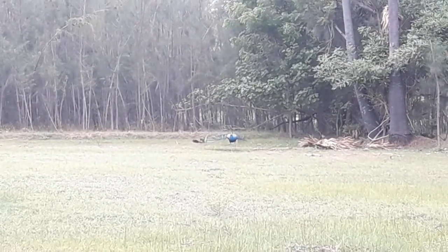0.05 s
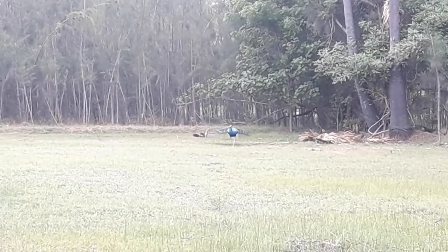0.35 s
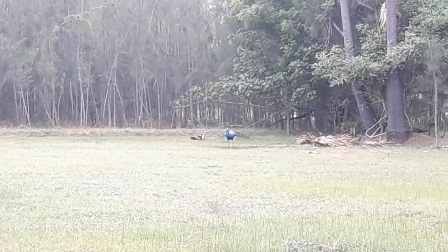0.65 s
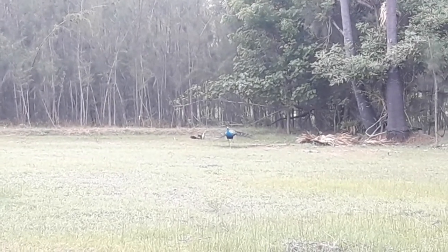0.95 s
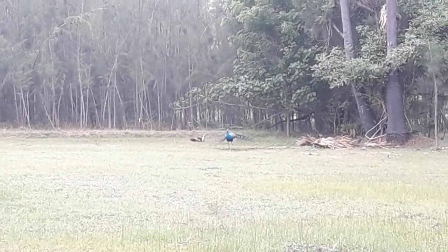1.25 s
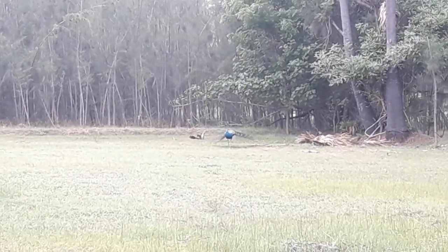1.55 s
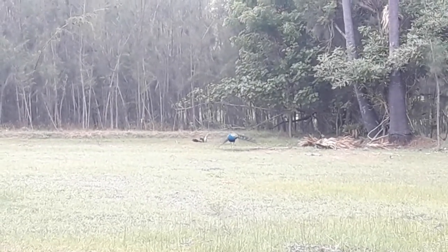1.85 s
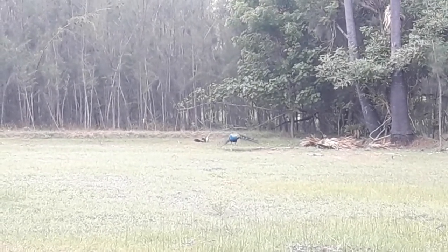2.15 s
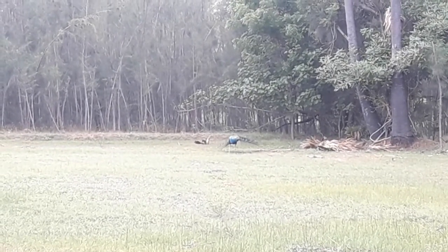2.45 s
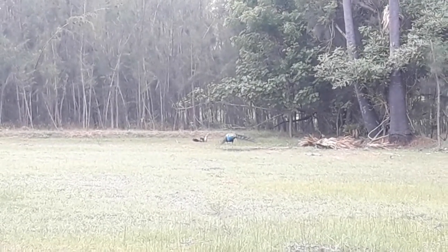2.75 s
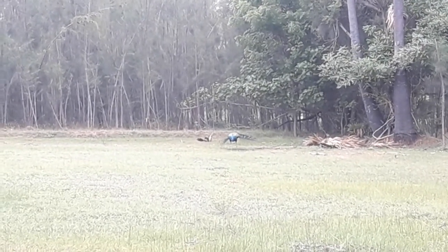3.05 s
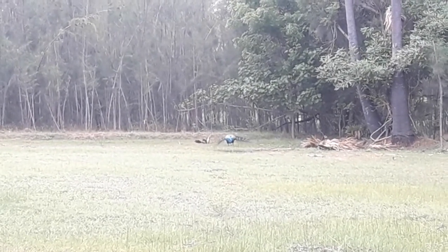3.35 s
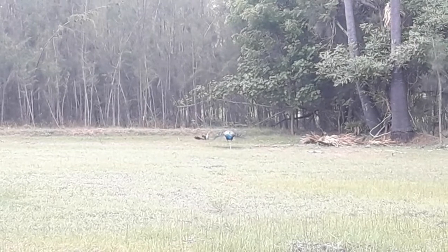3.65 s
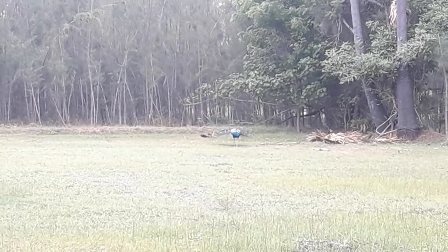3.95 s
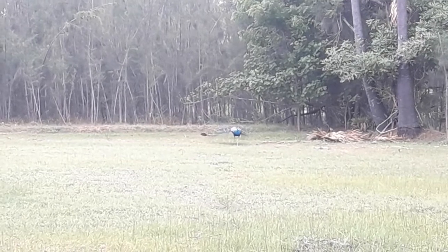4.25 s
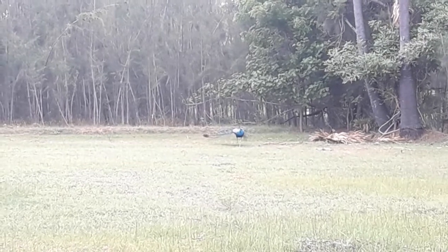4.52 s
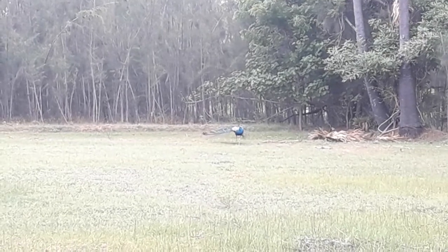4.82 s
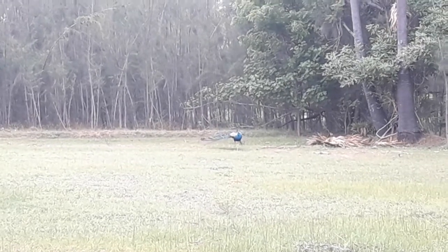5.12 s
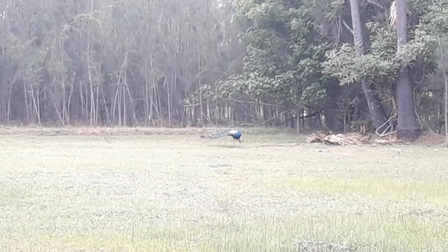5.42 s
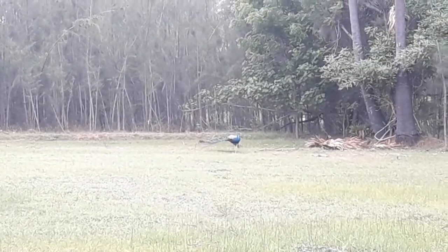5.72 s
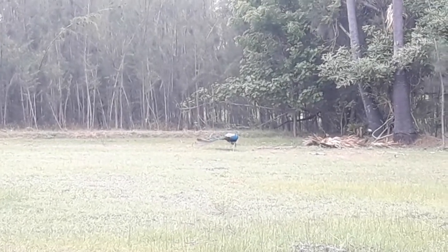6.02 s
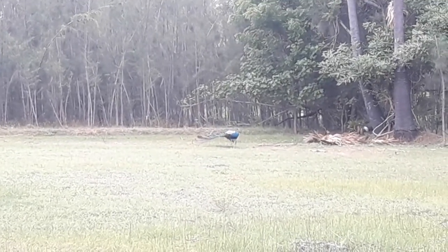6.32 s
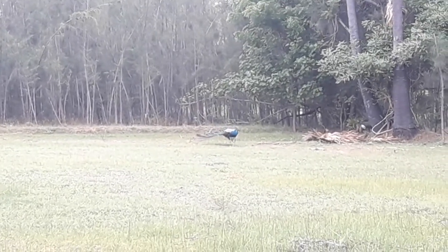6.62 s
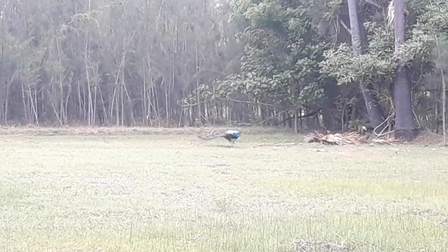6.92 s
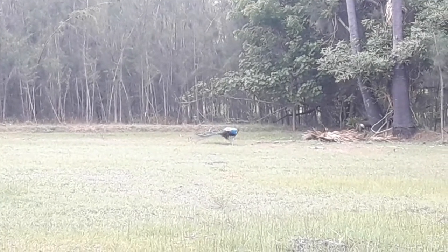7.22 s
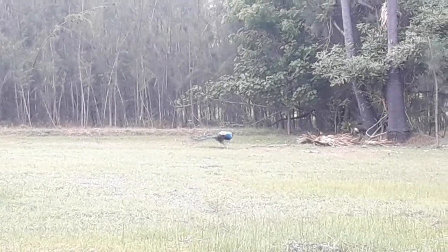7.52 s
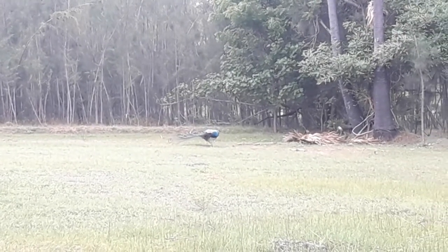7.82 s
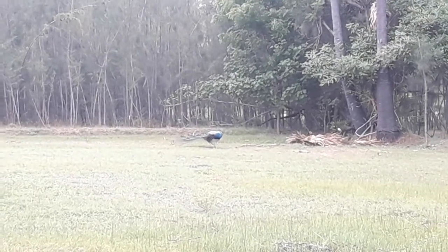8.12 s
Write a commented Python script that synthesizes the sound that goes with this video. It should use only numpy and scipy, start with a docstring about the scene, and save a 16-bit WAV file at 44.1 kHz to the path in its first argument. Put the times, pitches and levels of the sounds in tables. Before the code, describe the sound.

Soft hiss and a far low rumble fill a quiet field throughout. A bird rasps briefly at the start, and a small bird repeats a high two-note whistle in short groups until about 4 seconds. Faint calls and trills carry from deep in the wood. Handling knocks sound at the microphone near 1, 3.9 and 4.3 seconds, with thin ticks scattered around. Far fowl caw hoarsely near 3 and 5 seconds. A high twitter runs from 3.3 to 3.9 seconds, ending with sharp little snaps close by. From 4.5 to 6 seconds a louder bird gives two harsh rasps and three falling whistles. At about 6 seconds a distant gunshot thumps, echoes off the tree line and fades in a low roll. A few small snaps follow, and from 7 seconds faint chirps, trills and distant caws continue to the end.

```python
"""A quiet grass field at the edge of a wood, over soft hiss and far rumble. A loud bird rasps, a small one
repeats a whistled two-note song, and calls and trills carry from deep in the trees. Close to the microphone
come sparse knocks and ticks. Far fowl caw, a bird twitters high up, small snaps sound nearby, and the loud
bird returns with rasps and down-slurs. Near six seconds a distant gunshot thumps and rolls along the tree
line; faint chatter starts up after it."""
import sys
import numpy as np
from scipy import signal
from scipy.fft import rfft, irfft, next_fast_len
from scipy.io import wavfile

SR = 44100
rng = np.random.default_rng(int(sys.argv[2]) if len(sys.argv) > 2 else 0)


def log_audio(samples):
    """Write samples as a 16-bit WAV file to the path given in sys.argv[1]."""
    # one column per channel
    frames = np.atleast_2d(samples).T
    # limit to full scale, then quantise
    limited = np.clip(frames, -1, 1)
    pcm = np.round(limited * 32767).astype(np.int16)
    wavfile.write(sys.argv[1], SR, pcm)


N = 369116
T = np.arange(N) / SR


def from_db(db):
    return 10 ** (np.asarray(db) / 20)


def rms_one(x):
    return x / np.sqrt(np.mean(x ** 2) + 1e-20)


def add(out, s, x):
    """Mix x into out from time s on."""
    at = round(s * SR)
    x, at = x[max(-at, 0):], max(at, 0)
    out[at:at + len(x)] += x[:max(len(out) - at, 0)]


def colour(x, spectrum):
    """Filter by an (f/Hz, level/dB) outline that falls 30 dB an octave past its ends."""
    hz, db = np.transpose(spectrum)
    size = next_fast_len(len(x))
    octave, knots = np.log2(np.arange(size // 2 + 1) * SR / size + 1), np.log2(hz)
    outside = np.abs(octave - np.clip(octave, knots[0], knots[-1]))
    gain = from_db(np.interp(octave, knots, db) - 30 * outside)
    return irfft(rfft(x, size) * gain, size)[:len(x)]


def noise(spectrum):
    return rms_one(colour(rng.standard_normal(N), spectrum))


def wander(t, per_s):
    """A random wobble of spread about 1."""
    knots = rng.standard_normal(N // 20)
    return np.interp(t * per_s, np.arange(len(knots)), knots)


def band(x, low_hz, high_hz):
    sos = signal.butter(2, [low_hz, min(high_hz, .45 * SR)], "band", fs=SR, output="sos")
    return signal.sosfilt(sos, x + 1e-18)


def resonate(x, hz, width_hz):
    r = np.exp(-np.pi * width_hz / SR)
    feedback = [1, -2 * r * np.cos(2 * np.pi * hz / SR), r * r]
    return signal.lfilter(np.array([1, 0, -1]) * (1 - r * r) / 2, feedback, x + 1e-18)


def trees(x, near_db, far_db, near_t60=0.13, far_t60=0.86):
    """Echoes only: quick scatter from nearby branches and a long, duller tail from the wood."""
    t = T[:SR]
    near, far = rng.standard_normal((2, SR)) * (1 - np.exp(-t / 0.003))
    near = rms_one(near * from_db(-60 * t / near_t60))
    far = rms_one(far * from_db(-60 * t / far_t60))
    far = signal.sosfilt(signal.butter(1, 6000, fs=SR, output="sos"), far)
    echoes = (from_db(near_db) * near + from_db(far_db) * far) / np.sqrt(SR)
    return signal.fftconvolve(x, echoes)[:N]


# the open field's far rumble, its hiss, and the hiss that differs left to right: f/Hz, relative level/dB
FAR_RUMBLE = [(25, -55), (40, -16), (60, -14), (75, -4), (90, 3), (120, -4.5), (160, -0.5), (200, -9),
              (250, -14), (400, -31)]
FIELD_HISS = [(250, -2), (400, 1.5), (700, -1.5), (1200, -5.5), (2500, -8.5), (4000, -12), (5600, -13),
              (6800, -22.5), (8000, -27), (9500, -24), (11500, -19), (16000, -17.5)]
SIDE_HISS = [(53, -38), (90, -12), (124, -11), (161, -13), (222, -0.5), (667, 1), (743, 1), (3290, -7),
             (5510, -19.5), (14200, -7), (15500, -9)]

def field_air():
    """Low rumble from far off, and soft hiss all round the microphone."""
    rumble = from_db(-58 + 0.39 * wander(T, 1.7)) * noise(FAR_RUMBLE)
    hiss = from_db(-65) * noise(FIELD_HISS)
    side = from_db(-77) * noise(SIDE_HISS)
    return rumble + hiss + np.array([side, -side])


# the loud bird's rasps: start t/s, end t/s, level/dB, tilt/(dB per octave)
RASP_CALLS = [(-.12, 0.057, -50, 7.5), (4.554, 4.759, -50, 6), (5.485, 5.675, -50.5, 6)]
# its throat: f/Hz, relative level/dB
THROAT = [(590, -58), (1000, -48), (1140, -7), (1260, -11.5), (1360, -10), (1570, -6.5), (2070, -7.5),
          (3120, -3.5), (3890, -2.5), (5600, -17.5), (6180, -17.5), (8240, -44), (12100, -40), (14000, -47)]

def rasps(pulse_hz=215, jitter=0.19, depth=0.19, attack_s=0.037, release_s=0.017):
    """A harsh churr among the trees: noise chopped by the unevenly flapping syrinx, shaped by the throat."""
    out = np.zeros(N)
    for start, end, db, tilt in RASP_CALLS:
        t = T[:int((end - start) * SR)]
        phase = 2 * np.pi * np.cumsum(pulse_hz * (1 + jitter * wander(t, 312))) / SR
        chopped = rng.standard_normal(len(t)) * (1 + depth * np.cos(phase))
        throat = [(hz, level + tilt * np.log2(hz)) for hz, level in THROAT]
        swell = np.minimum(t / attack_s, 1) * np.minimum((t[-1] - t) / release_s, 1)
        add(out, start, from_db(db) * swell * rms_one(colour(chopped, throat)))
    return out + trees(out, near_db=-3, far_db=-2)


# outline of each whistled syllable: share of its length, pitch ratio, relative level/dB
SYLLABLES = { "tsit": [(0, .87, -15), (.2, 1, -9.5), (.45, .8, -3.5), (.62, .64, -5), (1, 0.353, -12.5)],
             "tew": [(0, .86, -17), (.18, .98, -6.5), (.38, 1.005, -1), (.8, .94, -5), (1, .89, -15)],
             "twit": [(0, 1.02, -9), (.26, .955, -2), (.38, .97, -18), (.58, 1.03, -15), (.67, 1.025, -1.5),
             (.87, .975, -3.5), (1, .88, -9)], "slur": [(0, .99, -6.5), (.26, 0.98, -6), (.41, .875, -1.5),
             (.56, .78, -4), (.76, .705, -5.5), (1, .645, -5.5)], "rise": [(0, .87, -1.5), (.6, 1, -1),
             (1, 1.1, -6)], "fall": [(0, 1.05, 3.5), (.3, 1.01, 2.5), (1, .93, -2)], "glide": [(0, 1, 0),
             (.5, .89, -5), (1, .79, 1.5)], "buzz": [(0, 1, -10), (.3, 1, 0), (.7, .985, 0), (1, .98, -10)],
             "hoot": [(0, 1.01, -10), (.1, 1.02, 1), (.8, .93, -4), (1, .9, -10)],
             "peep": [(0, 0.97, -13.5), (.4, 0.97, -1.5), (1, 0.99, -0.5)], }
# unsteadiness of each syllable: share of its pitch
PITCH_WAVER = {"tsit": .06, "tew": .003, "twit": .01, "slur": .015, "rise": .03, "fall": .018, "glide":
               .015, "buzz": .055, "hoot": .07, "peep": .018}

def whistles(notes, flutter_db, overtone_db, hoarse_db):
    """Each syllable is a gliding, unsteady near-sine; a rough edge smears its overtones."""
    out = np.zeros(N)
    for s, shape, length, hz, db in notes:
        t = T[:int(length * SR)]
        share, ratio, swell = np.transpose(SYLLABLES[shape])
        pitch = hz * np.interp(t / length, share, ratio) * (1 + PITCH_WAVER[shape] * wander(t, 608))
        phase = 2 * np.pi * np.cumsum(pitch) / SR
        level = from_db(db + np.interp(t / length, share, swell) + flutter_db * wander(t, 251))
        smear = wander(t, 1500)
        overtones = np.sin(2 * phase + smear) + .5 * np.sin(3 * phase + smear)
        hoarseness = rms_one(band(rng.standard_normal(SR), 2800, 6140))[:len(t)]
        tone = np.sin(phase) + from_db(overtone_db) * overtones + from_db(hoarse_db) * hoarseness
        add(out, s, np.sqrt(2) * level * tone * signal.windows.tukey(len(t), .08))
    return out


# the small bird's phrases: t/s, tsit level/dB, tew level/dB, tew f/Hz
SONG_PHRASES = [(-.062, -51, -49.5, 2860), (0.228, -50.5, -51.5, 2877), (.524, -49, -51.5, 2850),
                (1.759, -53.5, -53.5, 2846), (2.062, -52, -57, 2886), (2.96, -53, -51, 2840),
                (3.239, -51.5, -54, 2860), (3.528, -52, -53.5, 2844), (3.796, -50.5, -52, 2830),
                (4.096, -51.5, -57, 2747)]

def two_note_song(tsit_hz=6040, tsit_s=.03, tew_after_s=.092, tew_s=0.0639):
    """A small bird at the wood's edge whistles a steep "tsit" and answers it with an arched "tew"."""
    notes = []
    for s, tsit_db, tew_db, tew_hz in SONG_PHRASES:
        notes.append((s, "tsit", tsit_s, tsit_hz, tsit_db))
        notes.append((s + tew_after_s, "tew", tew_s, tew_hz, tew_db))
    song = whistles(notes, flutter_db=-0.2, overtone_db=-36, hoarse_db=-22.5)
    return song + trees(song, near_db=-2.5, far_db=-8.5)


# the clearer calls from deep in the wood: t/s, syllable, length/s, f/Hz, level/dB before distance
WOOD_CALLS = [(.14, "peep", .27, 1834, -59), (.15, "hoot", 0.29, 860, -70.5),
              (1.555, "peep", 0.084, 3860, -67), (2.25, "rise", 0.042, 2790, -59),
              (2.372, "buzz", 0.061, 2132, -54.5), (2.46, "hoot", 0.66, 801, -69),
              (3.66, "hoot", 0.47, 868, -61.5), (4.15, "rise", 0.037, 2750, -56.5),
              (4.275, "buzz", 0.046, 2360, -53), (4.475, "buzz", 0.048, 2350, -57),
              (5.058, "fall", .014, 5070, -59), (5.088, "fall", 0.016, 5270, -53.5),
              (5.143, "fall", 0.023, 2160, -54.5), (5.828, "fall", 0.016, 2190, -56),
              (6.585, "fall", 0.0164, 3100, -58.5), (6.995, "glide", 0.041, 3360, -63.5),
              (7.525, "rise", 0.022, 2710, -56.5), (7.677, "fall", 0.0094, 3090, -60),
              (7.735, "glide", 0.15, 4620, -67), (7.85, "buzz", 0.048, 2340, -60),
              (8.315, "fall", 0.012, 3140, -59)]

def far_calls(notes=WOOD_CALLS):
    """Whistles from well back in the trees, their direct sound weakened by distance."""
    calls = whistles(notes, flutter_db=2.5, overtone_db=-36, hoarse_db=-32)
    return from_db(-4) * calls + trees(calls, near_db=-7.5, far_db=-10.5)


# runs of far buzzy notes; the first two, near 0.6 s, are twit notes rather than the trill: start t/s, end t/s,
# f/Hz, level/dB before distance
TRILL_RUNS = [(0.555, .59, 5620, -60), (0.664, .7, 5440, -63.5), (1.306, 1.42, 5390, -64),
              (1.461, 1.66, 5340, -60), (2.019, 2.2, 5640, -64.5), (2.935, 2.98, 5740, -63),
              (3.21, 3.26, 5760, -63), (4.278, 4.39, 5290, -65.5), (7.179, 7.29, 5740, -65.5),
              (7.379, 7.57, 5690, -65.5), (7.658, 7.93, 5680, -65.5), (8.264, 8.37, 5620, -59.5)]

def far_trill(step_s=.074, note_s=0.038):
    """Buzzy notes at a steady pace, reaching the microphone more as scatter than direct."""
    notes = [(s, "buzz", note_s, hz, db)
             for start, end, hz, db in TRILL_RUNS for s in np.arange(start, end, step_s)]
    trill = whistles(notes, flutter_db=3, overtone_db=-40, hoarse_db=-10)
    return from_db(-8) * trill + trees(trill, near_db=-5.5, far_db=-4.5)


# touches on the camera body: t/s, level/dB
TOUCHES = [(0.9814, -36.5), (3.8847, -42), (3.9106, -40), (4.2696, -35), (7.65, -48), (8.068, -49)]
# the body's modes: f/Hz, relative level/dB, t60/s
BODY_MODES = [(350, -10, 0.05), (605, -1.5, 0.012), (1180, -5.5, 0.022), (1700, -19, 0.012),
              (3930, -17, 0.011)]

def knocks(spread_db=1.26):
    """Handling right at the microphone: each touch rings the few short modes of the camera body."""
    out, t = np.zeros(N), T[:SR // 8]
    for s, db in TOUCHES:
        for hz, mode_db, t60 in BODY_MODES:
            decay = from_db(db + mode_db + rng.normal(0, spread_db) - 60 * t / t60)
            add(out, s, decay * np.sin(2 * np.pi * hz * t))
    return out


# thin dry ticks: t/s, level/dB
DRY_TICKS = [(1.2176, -45), (1.301, -43.5), (1.4246, -45), (2.1506, -46), (2.5243, -42.5), (3.1008, -44),
             (3.6347, -46), (5.9904, -39.5), (6.5026, -42), (6.6553, -44), (7.1658, -42.5), (7.8078, -43),
             (8.2795, -41)]

def ticks(low_hz=4300, high_hz=6500, makeup_db=17):
    """Tiny clicks close to the microphone, each one impulse in a narrow, bright band."""
    out = np.zeros(N)
    for s, db in DRY_TICKS:
        add(out, s, from_db([db + makeup_db]))
    return band(out, low_hz, high_hz)


# hoarse fowl far into the wood: start t/s, end t/s, throat resonance f/Hz, level/dB before distance
FOWL_CRIES = [(2.95, 3.299, 1650, -58), (3.2, 3.496, 1814, -60), (4.621, 4.977, 1690, -59.5),
              (4.925, 5.306, 1660, -65.5), (7.13, 7.462, 1690, -57.5), (7.381, 7.767, 1800, -62)]

def far_fowl(pitch_hz=215, jitter=0.0602, width_hz=520):
    """Rough throat pulses ring one broad resonance, so far off that only scattered sound arrives."""
    out = np.zeros(N)
    for start, end, hz, db in FOWL_CRIES:
        t = T[:int((end - start) * SR)]
        arch = np.abs(np.sin(np.pi * t / t[-1]))
        cycles = np.cumsum(pitch_hz * (.9 + .1 * arch + jitter * wander(t, 200))) / SR
        pulses = np.diff(np.floor(cycles), prepend=0)
        cry = band(resonate(pulses, hz, width_hz), 0.72 * hz, 1.26 * hz)
        add(out, start, from_db(db) * rms_one(cry * arch ** 0.6))
    return trees(out, near_db=-5.5, far_db=-2.5)


# notes of the high twitter: t/s
TWITTER_TIMES = [3.305, 3.357, 3.424, 3.508, 3.583, 3.675, 3.73, 3.799, 3.866]

def twitter(note_s=.028, start_hz=5306, climb_hz_per_s=280, full_db=-46.5, soft_db=9, swell_s=0.089):
    """One whistled run from a nearer bird: it starts softly, reaches full voice and climbs a little."""
    notes = []
    for s in TWITTER_TIMES:
        elapsed = s - TWITTER_TIMES[0]
        db = full_db - soft_db * np.exp(-elapsed / swell_s)
        notes.append((s, "twit", note_s, start_hz + climb_hz_per_s * elapsed, db))
    run = whistles(notes, flutter_db=1, overtone_db=-45, hoarse_db=-20)
    return run + trees(run, near_db=-5, far_db=-14)


# small snaps: t/s, then peak level/dB of the low, middle and high ring
CLOSE_SNAPS = [(3.8575, -55, -48, -37), (3.8647, -60, -46, -48), (3.884, -45.5, -42.5, -50),
               (3.9265, -41, -25.5, -44), (3.929, -26, -61, -49), (6.0627, -34.5, -43.5, -68),
               (6.681, -72, -46, -68), (6.701, -73, -34.5, -51.5), (6.77, -70, -51, -69),
               (6.801, -74, -44.5, -54), (6.81, -53.5, -39.5, -53)]
# their rings: f/Hz, width/Hz
RINGS = [(1690, 170), (4150, 340), (10000, 990)]

def snaps(slip_s=0.0012):
    """Close to the microphone, a gritty slip of a few milliseconds excites three damped rings."""
    out, t = np.zeros(N), T[:SR // 20]
    for s, *levels in CLOSE_SNAPS:
        for db, (hz, width) in zip(levels, RINGS):
            grit = rng.standard_normal(len(t)) * t * np.exp(-t / slip_s)
            ring = resonate(band(grit, hz * 0.56, hz * 1.57), hz, width)
            add(out, s, from_db(db) * ring / np.abs(ring).max())
    return out


# the loud bird's down-slurs: t/s, length/s, f/Hz, level/dB
DOWN_SLURS = [(4.905, .1, 3898, -36), (5.156, .078, 3792, -36.5), (5.832, .1, 3857, -36.5)]

def slurs(lead_s=.042, lead_ratio=0.94, lead_drop_db=10, trunk_delay_s=0.024, trunk_db=-14):
    """A softer, level peep runs into each falling whistle, and a tree trunk throws both back."""
    notes = []
    for s, length, hz, db in DOWN_SLURS:
        notes.append((s - lead_s, "peep", lead_s, lead_ratio * hz, db - lead_drop_db))
        notes.append((s, "slur", length, hz, db))
    direct = whistles(notes, flutter_db=2, overtone_db=-33.5, hoarse_db=-22)
    trunk_echo = np.zeros(N)
    add(trunk_echo, trunk_delay_s, from_db(trunk_db) * direct)
    return direct + trunk_echo + trees(direct, near_db=-4.5, far_db=-4)


# the shot and its echoes from the tree line: t/s, level/dB before distance
SHOT_ARRIVALS = [(5.954, -8), (6.089, -16), (6.138, -26), (6.196, -25), (6.367, -30.5)]
# its crack, and its roll off the trees: f/Hz, relative level/dB
CRACK_SPECTRUM = [(600, -36), (820, -11), (1100, 5.5), (1450, -17), (1780, -0.5), (2300, -31), (3700, -24),
                  (5800, -36), (7500, -53)]
ROLL_SPECTRUM = [(24, -55), (40, -72), (66, -8), (174, -5), (229, -9), (422, -14.5), (761, -27.5),
                 (1070, -23), (1680, -28.5), (2160, -34), (3640, -36.5), (4260, -44), (5720, -42.5),
                 (9000, -72), (11700, -101), (19800, -120)]

def gunshot(blast_s=.0046, lag_s=0.00304, bounce_s=0.00778, bounce_db=-4, crack_db=-25, crack_t60=0.046):
    """A far shot: a short crack, N-shaped blasts dulled by distance, then rumble off the trees."""
    blasts, crack = np.zeros((2, N))
    n_wave = np.linspace(-1, 1, int(blast_s * SR))
    for s, db in SHOT_ARRIVALS:
        add(blasts, s + lag_s, from_db(db) * n_wave)   # the low push follows the crack
        add(blasts, s + lag_s + bounce_s, from_db(db + bounce_db) * n_wave)   # off a nearby surface
    thumps = band(band(blasts, 72, 300), 42, 700)
    shot_s, t = SHOT_ARRIVALS[0][0], T[:SR]
    crack_level = np.minimum(t / 0.0011, 1) * from_db(crack_db - 60 * t / crack_t60)
    add(crack, shot_s, noise(CRACK_SPECTRUM)[:SR] * crack_level)
    age = np.maximum(T - shot_s, 0)
    dying = from_db(-34.5 - 30.5 * age)   # the roll dies quickly at first
    lingering = from_db(-57.5 - 6.5 * age)   # then hangs on far away
    roll_level = np.minimum(age / 0.0045, 1) * np.hypot(dying, lingering)
    roll = noise(ROLL_SPECTRUM) * roll_level * from_db(2.5 * wander(T, 70))
    return thumps + crack + roll


def far_chatter(start_s=7.03, end_s=8.3, step_s=.14, low_hz=2190, high_hz=2596, note_s=0.0303, db=-65.5):
    """Faint chirps up or down from deep in the wood, loosely spaced, at random pitches and lengths."""
    notes = []
    for s in np.arange(start_s, end_s, step_s):
        late, turn, stretch, height = rng.random(4)
        shape = "fall" if turn > .5 else "rise"
        hz = low_hz + height * (high_hz - low_hz)
        notes.append((s + .5 * late * step_s, shape, note_s * (.5 + stretch), hz, db))
    return far_calls(notes)


# the microphone's treble notch and the lift above it: f/Hz, gain/dB
MIC_RESPONSE = [(300, 0.5), (6300, -2), (7200, -6), (8200, -12), (9500, -4), (11500, 5.5), (16000, 0)]

def scene():
    """All as heard from the field; whistles, fowl and ticks pass through the microphone's notch."""
    air, churr = field_air(), rasps()
    birds = two_note_song() + far_calls() + far_trill() + far_fowl() + twitter() + slurs() + far_chatter()
    return air + churr + colour(birds + ticks(), MIC_RESPONSE) + knocks() + snaps() + gunshot()


def record(dry):
    """The top is cut steeply at 15.8 kHz."""
    return signal.sosfilt(signal.ellip(12, .1, 70, 15800, fs=SR, output="sos"), dry)


dry = scene()
out = record(dry)
log_audio(out)
```